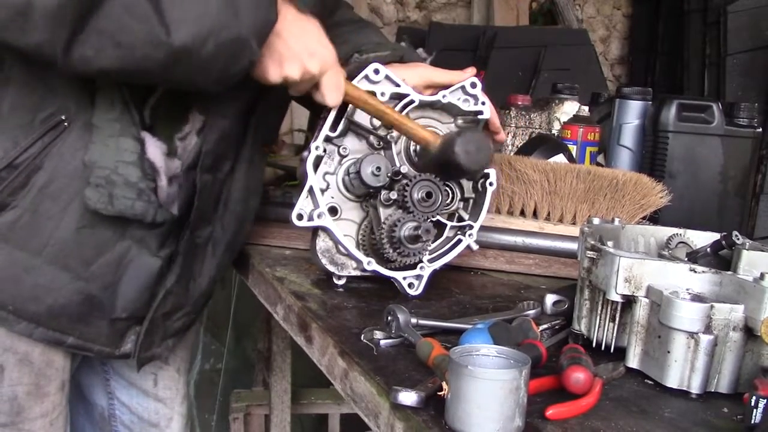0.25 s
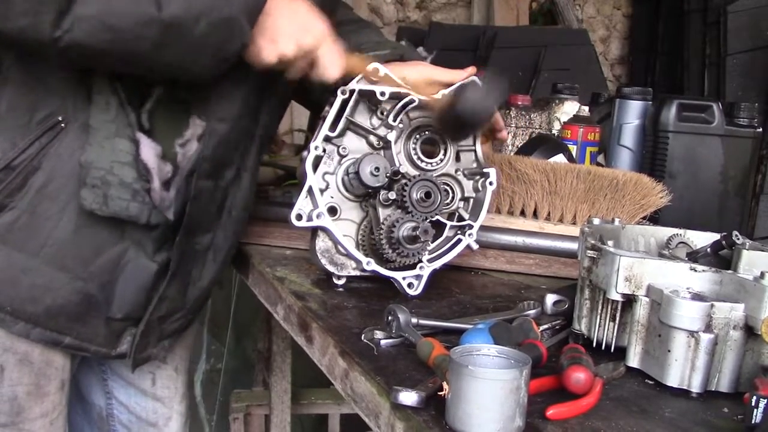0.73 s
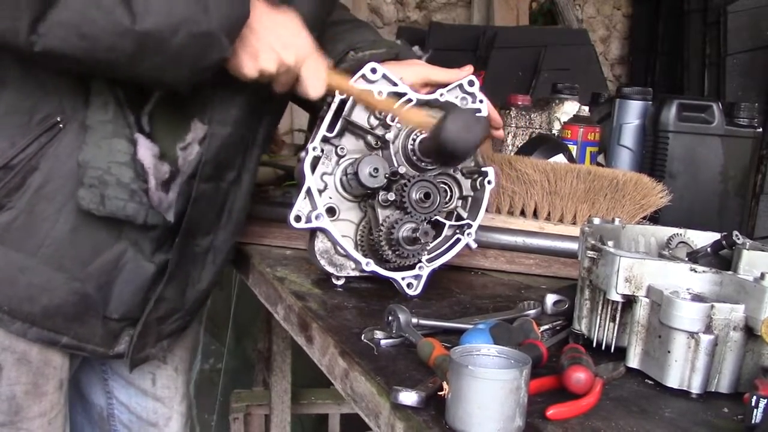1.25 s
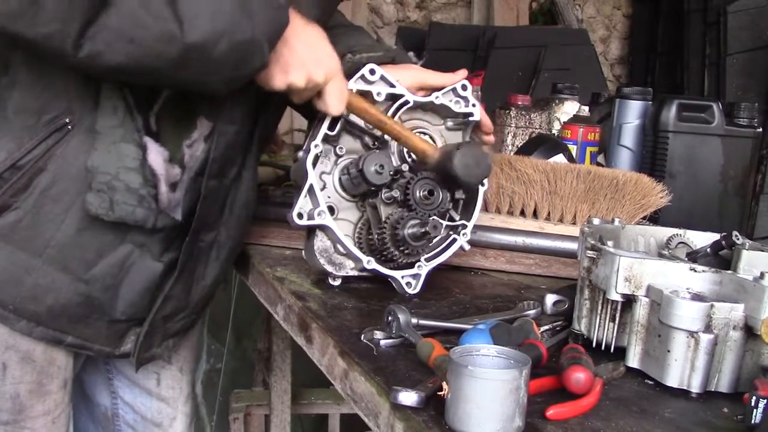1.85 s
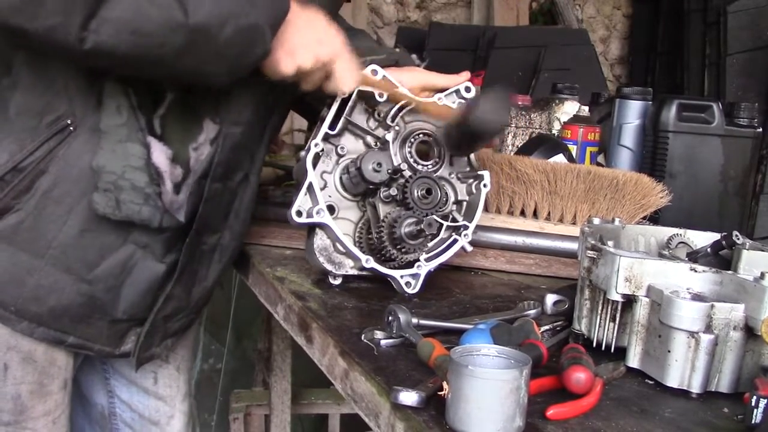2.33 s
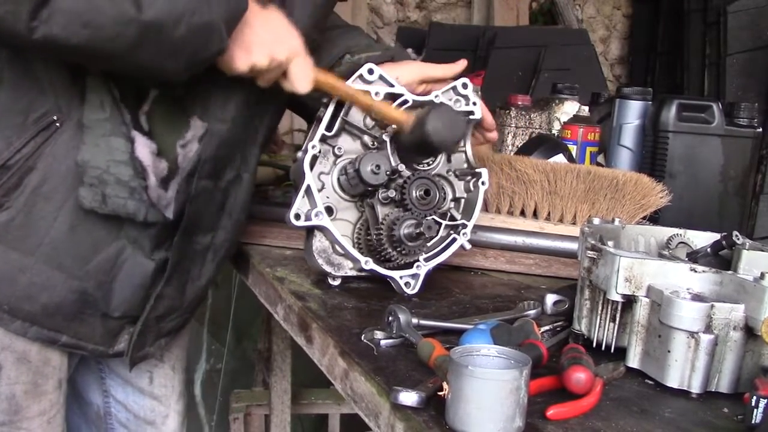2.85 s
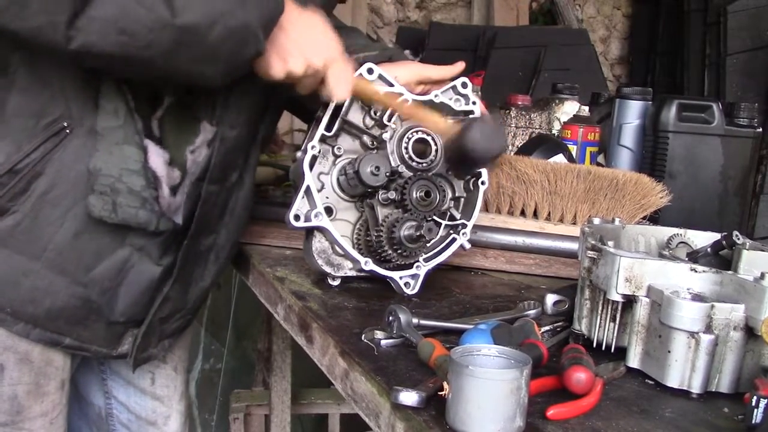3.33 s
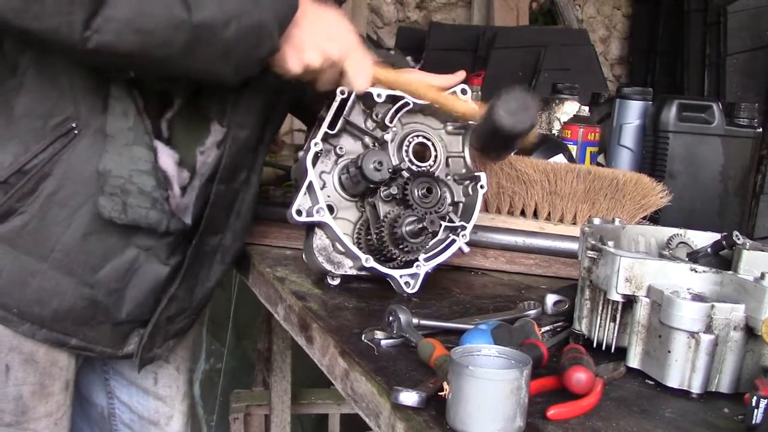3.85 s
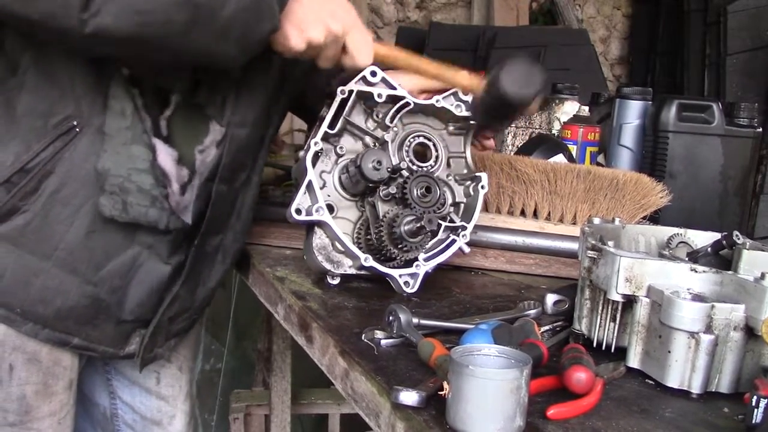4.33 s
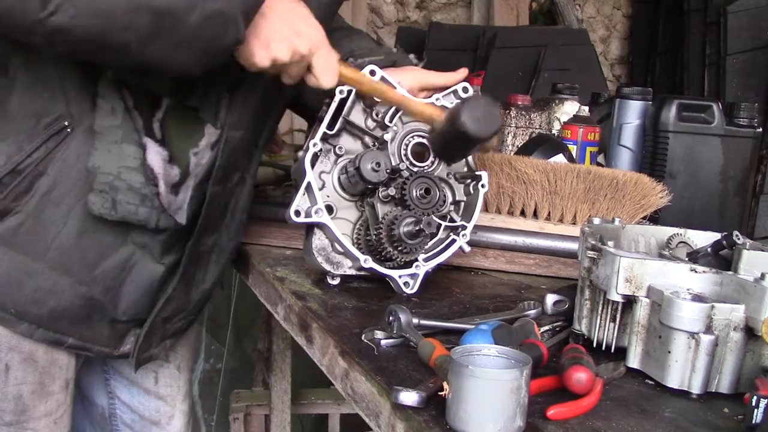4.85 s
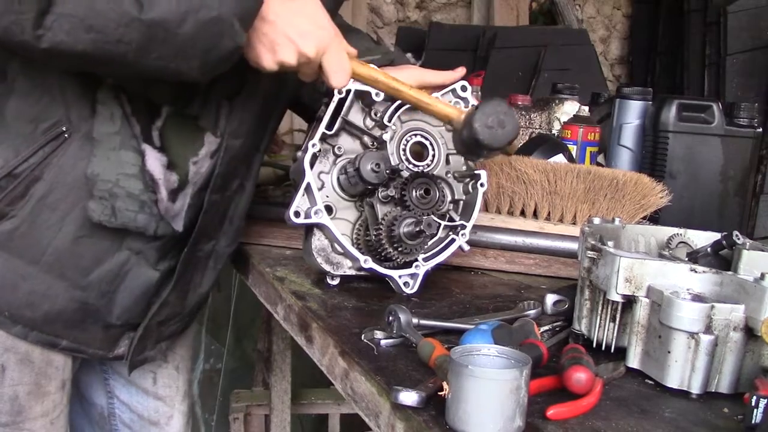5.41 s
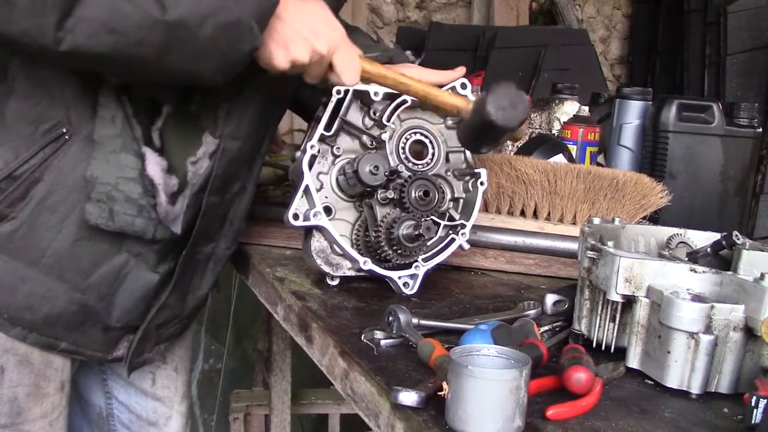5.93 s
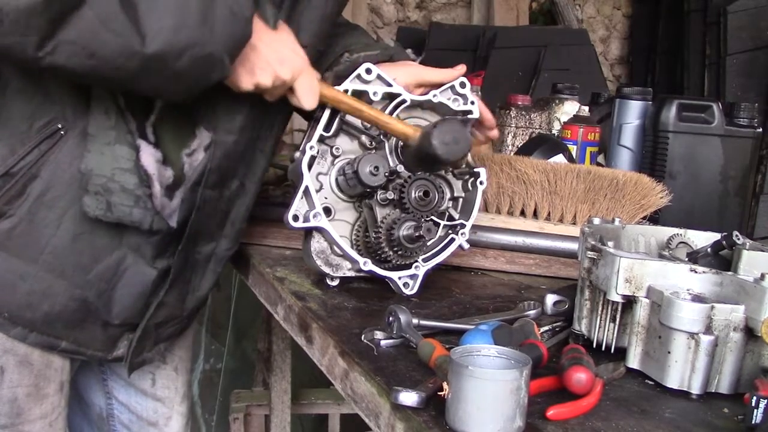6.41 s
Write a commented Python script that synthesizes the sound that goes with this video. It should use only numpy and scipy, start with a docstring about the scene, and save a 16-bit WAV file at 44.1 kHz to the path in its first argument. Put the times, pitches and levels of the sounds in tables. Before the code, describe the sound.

A rubber mallet strikes an open engine casing standing on a wooden bench in a small workshop, heard close, with a short dry room around it. Blows begin at once and repeat about every 0.27 seconds until 5.1 seconds, twenty in all. Each is a blunt thump and noisy metallic clang, with a flurry of gear and bearing chatter and a short ring dying within about 0.2 seconds. The second blow, at 0.3, is especially heavy, just after a brief sinking low hum. Many blows are followed by a knock as the casing drops back. From about 3.2 the thumps are often lighter and the gears rattle more brightly. A pause from 5.2 to 5.7 leaves soft air, faint cloth and thin hiss. Three slower blows follow at 5.7, 6.1 and 6.5, the last two with strong drop-back clatter. Sleeve swishes precede blows; loud peaks distort.

```python
"""A quiet bed of outdoor air and cloth runs throughout; a stiff jacket sleeve swishes before every blow. From
the start a rubber mallet knocks an open engine casing on a wooden bench in a small workshop: twenty blows in a
near-steady beat. Each is a dull push, a noisy clang through the parts, a held level plateau and free ringing;
after many the casing drops back on the bench. A low hum sinks early on; a faint one and a thin hiss come in the
pause near the end, before three slower blows with brief rustles. The loudest peaks clip."""
import sys
import numpy as np
from scipy import signal
from scipy.fft import rfft, irfft, next_fast_len
from scipy.io import wavfile
from scipy.ndimage import uniform_filter1d

SR = 44100
rng = np.random.default_rng(int(sys.argv[2]) if len(sys.argv) > 2 else 0)


def master(y):
    """Save y as 16-bit WAV."""
    cut = np.clip(np.atleast_2d(y).T, -1, 1)
    pcm = np.round(cut * 32767)  # scale
    wavfile.write(sys.argv[1], SR, pcm.astype(np.int16))


N = 294579

# background level over time: start_s, air_db, cloth_db
BED_LEVELS = [(0, -50, -44), (0.235, -49.5, -59), (0.6, -50, -52.5), (1.2, -49.5, -58.5), (1.571, -49, -54),
              (1.844, -50, -59), (2.2, -55, -56.5), (2.8, -52, -59.5), (3.2, -49, -56), (3.7, -53.5, -53.5),
              (4.466, -49, -56.5), (5.0, -52, -55), (5.4, -53.5, -52.5), (5.56, -58, -58), (5.68, -50, -51),
              (6.043, -55.5, -61), (6.3, -54.5, -56.5), (6.68, -53.5, -54)]
# colour of the outdoor air, then of the cloth: pitch_hz, relative density_db (per Hz)
AIR_COLOUR = [(18, -56.5), (30, -3.5), (221, 4.5), (308, 8), (420, 3.5), (1550, -4.5), (1850, -9.5),
              (5140, -19), (6000, -16), (7800, -52), (13200, -120)]
CLOTH_COLOUR = [(88, -36.5), (150, -10.5), (340, 2), (1010, 1), (1110, -6), (1200, -1), (2580, 1),
                (4900, -5.5), (10300, -11.5), (15800, -20)]
# stereo width of air and cloth: pitch_hz, side_minus_mid_db
BED_WIDTH = [(100, -17), (2000, -14.5), (8000, -25.5), (15000, -10)]
# brief cloth rustles: centre_s, half_length_s, level_db
CLOTH_RUSTLES = [(5.675, 0.015, -57.5), (5.934, .025, -51.5), (6.297, 0.033, -55.5)]
# thin high hiss: start_s, end_s, pitch_hz, width_hz, level_db
THIN_HISS = (5.36, 5.8, 10700, 900, -66)
# short low hums: start_s, swell_s (half the length), start_hz, end_hz, level_db
LOW_HUMS = [(0.247, 0.068, 293.8, 228.2, -20.5), (5.343, 0.019, 255, 245, -39)]
# faint taps: start_s, pitch_hz, level_db
FAINT_TAPS = [(1.645, 800, -22), (1.834, 500, -34.5), (1.853, 520, -38), (4.714, 304, -34.5),
              (6.429, 1500, -39.5)]
# the casing drops back on the bench: start_s, thud_db, clang_db, treble_tilt_db (per octave over 3 kHz)
DROPS = [(0.0579, -10, -17, -6.5), (0.6074, -1, -29.5, 8.5), (0.8631, -1.5, -24.5, 1),
         (0.8756, -0.5, -31, -5.5), (1.1304, -2.5, -25.5, -0.5), (1.398, -7, -21.5, -3.5),
         (1.9372, -5, -22, -5), (2.2026, 0.5, -27, 3), (2.467, -1.8, -20.5, 6), (2.711, 2.5, -17.5, -4),
         (3.4844, -13, -25.5, -2.5), (4.2841, -15, -27, 1.2), (4.3017, -10, -23, 0),
         (4.5602, -10.5, -21.5, 9), (4.817, -9, -17, 7), (5.1151, -2.5, -19, -7.5), (5.752, -5.5, -20, 0.5),
         (6.1389, 0, -11.5, 2.3), (6.5312, -3.5, -9.5, -0.5)]
# mallet blows: start_s, thud_db, then the db over the usual share that reaches bench_db, rim_db, gears_db,
# small_parts_db, then plateau_hold_s, sleeve_db
MALLET_BLOWS = [(0.0405, 3, 1.2, 3.5, 1.3, -5, 0.031, -55.5), (0.3093, 15, 2.1, 1.3, -1.5, 3.5, 0.028, -42),
                (0.5891, 8.5, 2, 0, -8, -4, 0.032, -44.5), (0.8455, 9, 5.5, 0.5, -6.5, -5, 0.019, -53),
                (1.1167, 6, 2.6, 2.7, -1.5, -1, 0.032, -46), (1.3751, 4, -1.4, 4.5, 10, 2.5, 0.03, -48),
                (1.6467, 5.5, -0.8, 2, -0.3, -5.5, 0.026, -49),
                (1.918, 8, -0.1, -1.2, -7.5, -6, 0.027, -47.5), (2.1877, 7, 2, -1.7, -5, -5, 0.026, -44.5),
                (2.4467, 8.5, 1.2, -2, -7, -4.5, 0.027, -43.5),
                (2.691, 7.5, 2, -2, -10.5, -6.5, 0.025, -47),
                (2.9471, 3.5, 0.3, 6.5, -5.5, -0.1, 0.032, -44), (3.2, -3, -2.1, -0.6, 4, 1.4, 0.04, -47.5),
                (3.457, -3.5, -1, 2, 2.2, 4, 0.031, -50), (3.7328, 0.3, -1.5, 0.5, 5, 3, 0.04, -49),
                (4.002, 6.5, 1.5, 2.5, 4.5, 2, 0.032, -46), (4.272, -6, 3, -1, 4, 7.5, 0.029, -47),
                (4.5403, -4.5, 3, -4, 5.5, 7.6, 0.032, -45.5), (4.8045, 5, -5.5, -0.6, 5, 4, 0.032, -45.5),
                (5.0759, -0.1, -4.5, -4, 12, 3.4, 0.043, -52),
                (5.7299, 2.5, -4.5, -4.5, -0.7, 1, 0.024, -60), (6.1176, 6.5, -2.5, -3, 6, 2, 0.038, -46),
                (6.504, 0.5, -2.5, 0.1, 6.5, 2.2, 0.038, -50.5)]
# resonances of each part of bench and casing: pitch_hz, width_hz, relative level_db
LEG_MODES = [(96, 13, 3), (179, 30, 2.5)]
BENCH_MODES = [(238, 72, 2), (315, 50, 3.5), (414, 110, -0.5)]
SHELL_MODES = [(490, 100, 2.5), (630.6, 40, 6.5), (702, 82, 1.5), (804, 96, 3), (888, 71, 5),
               (980, 85, -10.5), (993, 25, -5), (1255, 99, -3)]
RIB_MODES = [(1364, 220, 2.5), (1526, 120, 7.5), (1672, 175, 9), (1757, 90, 5), (1802, 93, 4.5),
             (2030, 760, 1)]
SHAFT_MODES = [(2422, 260, 2.5), (2776, 160, 5.5), (2908, 110, 7.5), (3320, 620, 2), (3956, 120, 1.5),
               (3986, 530, 1.5), (4810, 750, -2)]
GEAR_MODES = [(4920, 160, 2.5), (5443, 290, 9.5), (5995, 90, 7), (5650, 150, 4)]
SHIM_MODES = [(6250, 300, 0), (6770, 390, 2), (7167, 84, 6.5), (7670, 260, -3)]
BEARING_MODES = [(7790, 54, 6.5), (8300, 380, 4), (8950, 250, 5.5), (9690, 750, -1), (10850, 530, -4),
                 (11520, 240, -3), (12400, 700, -8.5), (14100, 900, -11.5), (15300, 900, -24.5)]
PARTS = [LEG_MODES, BENCH_MODES, SHELL_MODES, RIB_MODES, SHAFT_MODES, GEAR_MODES, SHIM_MODES, BEARING_MODES]
# settling of the rattle, one value for each of PARTS: t60_s
SETTLE_T60 = [0.23, 0.19, 0.18, 0.19, 0.2, 0.21, 0.19, 0.17]
# rattle of each of PARTS: usual_db, then the db gained per db into bench, rim, gears, small_parts
PART_DRIVE = [(-30, 1.46, .15, 0.031, 0), (-24, 1.2, -0.15, 0.1, -0.07), (-20.5, 0.66, -.2, 0.095, -0.24),
              (-24, 0, 0.92, 0, -0.033), (-24.5, 0, .35, 0.32, 0.02), (-34, 0, -0.17, 0.9, 0),
              (-31.5, 0, -.2, -0.04, .83), (-34, 0, .2, -0.084, 1.06)]
# lightly damped free modes: pitch_hz, level_db (over their part's rattle, before the metal lift), t60_s
FREE_MODES = [(106, 5, .21), (165, 10, .2), (231, 0, .18), (598, -5, .14), (898, -5, .12), (983, -7, .15),
              (1566, -6, .17), (1663, -3, .17), (1781, -2, .17), (1868, -4, .17), (2438, -8, .15),
              (2792, -1, .19), (2948, -3, .19), (3299, -7, .16), (4791, -8, .15), (5460, -3, .14),
              (5690, -3, .14), (7076, -2, .16), (7975, -4, .14), (11580, -10, .15)]
# decay of the room: pitch_hz, t60_s
ROOM_DECAY = [(80, 0.11), (300, 0.22), (1100, 0.29), (4000, 0.19), (12000, 0.2)]
# stereo width of the room: pitch_hz, side_minus_mid_db
ROOM_WIDTH = [(100, -47.5), (1000, -21), (3000, -8.5), (6000, -1), (10000, -5.5), (13000, -4)]
# first reflections off nearby things: pitch_hz, side_db (under the direct sound)
NEAR_WIDTH = [(100, -43.5), (800, -38.5), (2000, -28), (5000, -23), (12000, -25)]

THUD_HZ = 856  # pitch of the mallet's push
CLANG_DB, BRIGHT_DB = 16.5, 3  # clang over the rattle at 3 kHz, its tilt per octave
# free modes above METAL_HZ ring stronger and vary more from blow to blow
METAL_HZ, METAL_DB, METAL_SCATTER_DB, WOOD_SCATTER_DB = 1400, 1.5, 4, 1.5
TOP_HZ = 15900  # band limit


def amp(db):
    """dB to gain."""
    return 10 ** (np.asarray(db) / 20)


def unit(x):
    """Scale to rms 1."""
    return x / np.sqrt(np.mean(x ** 2) + 1e-20)


def along(points, hz):
    """Read a curve of (Hz, value) points on a log frequency axis."""
    point_hz, value = np.transpose(points)
    return np.interp(np.log(hz + 1), np.log(point_hz + 1), value)


def filtered(x, response):
    """Multiply the spectrum of x by a response, which may be complex."""
    size = next_fast_len(N + SR // 2)
    spectrum = rfft(x, size) * response(np.fft.rfftfreq(size, 1 / SR))
    return irfft(spectrum, size)[..., :N]


def place(times, levels_db, shapes):
    """Add one shape at each time."""
    out = np.zeros(N + SR)
    for start, db, shape in zip(times, levels_db, shapes):
        out[round(start * SR):][:len(shape)] += amp(db) * shape
    return out[:N]


def rush(colour):
    """Patchy stereo noise of rms 1: its level wanders over time and pitch, mostly alike on both sides."""
    grains = signal.stft(rng.standard_normal((2, N)), nperseg=512)[2]
    patches = uniform_filter1d(rng.standard_normal(grains.shape[1:]), 6, 0)
    patches = uniform_filter1d(patches, 8, 1)
    pair = signal.istft(grains * amp(2.1 * unit(patches)), nperseg=512)[1][:, :N]
    mid, side = filtered(pair, lambda hz: amp(along(colour, hz)) * [hz >= 0, amp(along(BED_WIDTH, hz))])
    return unit(np.array([mid + side, mid - side]))


def background():
    """Outdoor air, cloth rustle, and the sleeve's friction noise swelling into each blow."""
    when, air_db, cloth_db = np.transpose(BED_LEVELS)
    now = np.arange(N) / SR
    blow_s, sleeve_db = np.transpose(MALLET_BLOWS)[[0, -1]]
    ahead = blow_s[:, None] - now  # time left before the blow
    swing = np.clip((0.075 - ahead) / 0.049, 0, 1) ** 2 * (ahead > 0)
    cloth = amp(np.interp(now, when, cloth_db)) + amp(sleeve_db) @ swing
    for centre, half, db in CLOTH_RUSTLES:
        cloth += amp(db) * np.exp(-((now - centre) / half) ** 2)
    air = amp(np.interp(now, when, air_db))
    return air * rush(AIR_COLOUR) + cloth * rush(CLOTH_COLOUR)


def hiss():
    """Narrow noise that comes in quickly and fades."""
    start, end, hz, width_hz, db = THIN_HISS
    band = filtered(rng.standard_normal(N), lambda f: np.exp(-((f - hz) / width_hz) ** 2))
    fade = np.interp(np.arange(N) / SR, [start, start + 0.03, end], [0, 1, 0])
    return amp(db) * unit(band) * fade


def low_hums():
    """A short low hum with a weak octave sinks in pitch as it swells and fades."""
    out = np.zeros(N)
    for start, swell, start_hz, end_hz, db in LOW_HUMS:
        t = np.arange(round(2 * swell * SR)) / SR
        pitch = end_hz + (start_hz - end_hz) * np.exp(-3 * t / swell)
        phase = 2 * np.pi * np.cumsum(pitch) / SR
        tone = np.sin(phase) + 0.18 * np.sin(2 * phase)
        out += place([start], [db], [tone * np.sin(np.pi * t / (2 * swell)) ** 2])
    return out


def part_levels():
    """Rattle dB of every part (rows) at every blow (columns), from where the blow's energy goes."""
    drive = np.array(PART_DRIVE)
    return drive[:, :1] + drive[:, 1:] @ np.transpose(MALLET_BLOWS)[2:-2]


def rings():
    """Lightly damped modes ring freely; every blow starts them at new strengths."""
    blow_s = np.transpose(MALLET_BLOWS)[0]
    hz, level_db, t60 = np.transpose(FREE_MODES)
    part = np.searchsorted([modes[0][0] * 0.98 for modes in PARTS], hz) - 1
    # three draws per blow and mode: strength, detune, phase
    chance = rng.standard_normal((len(blow_s), 3 * len(hz))).reshape(len(blow_s), 3, -1)
    metal_db = METAL_DB + METAL_SCATTER_DB * chance[:, 0]
    extra_db = np.where(hz > METAL_HZ, metal_db, WOOD_SCATTER_DB * chance[:, 0])
    strength = amp(part_levels().T[:, part] + level_db + extra_db)
    t = np.arange(SR // 3)[:, None] / SR
    build = 1 - np.exp(-t / (0.0004 + 1.7 / hz))  # low modes need a few cycles to build
    fade = amp(-60 * t / t60) * build
    shapes = []
    for gain, (_, detune, phase) in zip(strength, chance):
        tones = np.sin(2 * np.pi * (hz * (1 + 0.0016 * detune) * t + phase))
        shapes.append((fade * tones) @ gain)
    return place(blow_s, 0 * blow_s, shapes)


def grit(spread_db, rate):
    """Noise whose size jumps rate times a second, as small contacts do."""
    steps = rng.standard_normal(int(N * rate / SR) + 2)
    size = steps[(np.arange(N) * rate / SR).astype(int)]
    return unit(rng.standard_normal(N) * amp(spread_db * size))


def body(modes):
    """Causal response of a part's resonances, steep outside them, passing white noise at rms 1."""
    low_hz, high_hz = 0.55 * modes[0][0], 1.6 * modes[-1][0]

    def response(f):
        ring = 0
        for k, (hz, width, db) in enumerate(modes):
            mode = 1j * f * width / (hz * hz - f * f + 1j * f * width)
            ring = ring + (-1) ** k * amp(db) * mode  # neighbours push opposite ways
        ring = ring * (1j * f / (low_hz + 1j * f)) ** 2 / (1 + 1j * f / high_hz) ** 2
        return ring / np.sqrt(np.mean(np.abs(ring) ** 2))
    return response


def rattle():
    """Gritty force through each part's resonances: clang at the blow, a level plateau through the hold, then
    settling."""
    blow_s, hold = np.transpose(MALLET_BLOWS)[[0, -2]]
    drop_s, _, drop_db, tilt_db = np.transpose(DROPS)
    t = np.arange(SR // 2) / SR
    drop_fade = [amp(-60 * t / 0.011)] * len(drop_s)
    out = np.zeros(N)
    for modes, db, t60 in zip(PARTS, part_levels(), SETTLE_T60):
        octave = np.log2(modes[len(modes) // 2][0] / 3000)
        clang = amp(CLANG_DB + BRIGHT_DB * octave) * np.exp(-(t / 0.0038) ** 1.68)
        clang = clang * (1 - np.exp(-t / 0.000063))
        settling = amp(-60 * np.maximum(t - hold[:, None], 0) / t60)
        plateau = (1 - np.exp(-t / 0.0088)) * settling
        force = place(blow_s, db, clang + plateau)
        part_drop_db = drop_db - 3.0 * abs(octave) + tilt_db * max(octave, 0)
        force += place(drop_s, part_drop_db, drop_fade)
        out += filtered(force * grit(2.26, 600), body(modes))
    return out


def thuds(times, levels_db, hz, width):
    """A soft face pushes out a short wave around a deep trough, one cycle after the start."""
    t = np.arange(SR // 50) / SR
    hz = np.reshape(hz, (-1, 1))
    late = t - 1 / hz
    push = -np.cos(2 * np.pi * hz * late) * np.exp(-(late / width) ** 2)
    push = push * (1 - np.exp(-t / 0.0001))
    return place(times, levels_db, np.broadcast_to(push, (len(times), len(t))))


def knocks():
    """The dull pushes of blows, rebounds, faint taps and the casing rocking on its feet."""
    blow_s, blow_db = np.transpose(MALLET_BLOWS)[:2]
    hold = np.transpose(MALLET_BLOWS)[-2]
    shell_db = part_levels()[2]
    drop_s, drop_db = np.transpose(DROPS)[:2]
    tap_s, tap_hz, tap_db = np.transpose(FAINT_TAPS)
    out = thuds(blow_s, blow_db, THUD_HZ, 0.00079)
    out += thuds(drop_s, drop_db, 907, 0.0006)
    out += thuds(tap_s, tap_db, tap_hz, 0.002)
    # six small rocking knocks after each blow
    when, pitch, size = rng.random((len(blow_s), 18)).reshape(len(blow_s), 3, 6).transpose(1, 0, 2)
    rock_s = blow_s[:, None] + 0.00792 + 1.8 * hold[:, None] * when
    rock_db = shell_db[:, None] + 9.5 - 8 * when - 7 * size
    return out + thuds(rock_s.ravel(), rock_db.ravel(), 420 * 2.4 ** pitch.ravel(), 0.0012)


def room(x):
    """A diffuse tail: each frequency dies at its own speed; the sides differ mostly in the treble."""
    _, t, z = signal.stft(rng.standard_normal((2, SR // 2)), SR, nperseg=256)
    hz = np.fft.rfftfreq(256, 1 / SR)
    z = z * amp(-60 * t / along(ROOM_DECAY, hz)[:, None])
    z[1] *= amp(along(ROOM_WIDTH, hz))[:, None]
    mid, side = signal.istft(z, SR, nperseg=256)[1]
    tail = np.array([mid + side, mid - side]) / np.linalg.norm(mid)
    delayed = np.pad(x, (300, 0))[None]  # samples
    return signal.fftconvolve(delayed, tail, axes=1)[:, :N]


def nearby(x):
    """Reflections within a few ms reach the two microphone ports unequally."""
    t = np.arange(SR // 100) / SR
    echo = rng.standard_normal(len(t)) * amp(-60 * t / 0.006)
    reflected = signal.fftconvolve(x, echo / np.linalg.norm(echo))[:N]
    side = filtered(reflected, lambda hz: amp(along(NEAR_WIDTH, hz)))
    return np.array([side, -side])


def scene():
    """The background, hums and hiss, then ringing, rattle and knocks with their reflections."""
    bed = background() + hiss() + low_hums()
    casing = rings() + rattle() + knocks()
    return bed + casing + amp(-18.5) * room(casing) + nearby(casing)


def record(dry):
    """The microphone drops deep bass, the input stage clips hard, nothing is kept above the band limit."""
    picked = filtered(dry, lambda hz: (1j * hz / (45 + 1j * hz)) ** 2)
    clipped = picked / (1 + np.abs(picked) ** 24) ** (1 / 24)
    return filtered(clipped, lambda hz: hz < TOP_HZ)


dry = scene()
out = record(dry)
master(out)
```